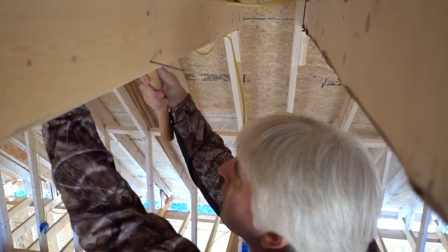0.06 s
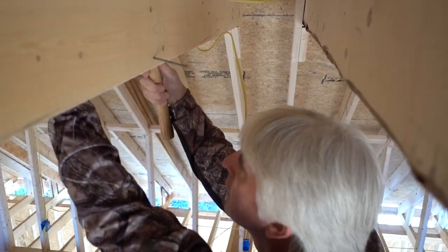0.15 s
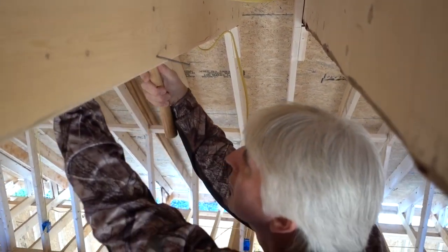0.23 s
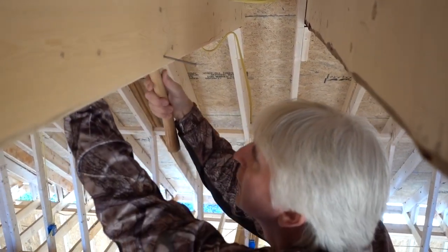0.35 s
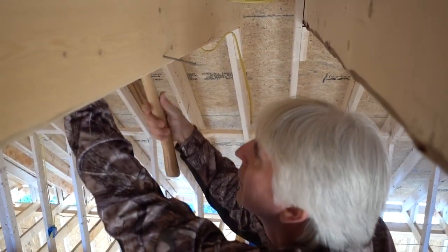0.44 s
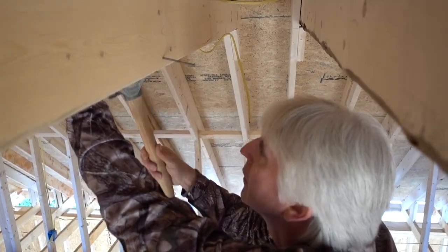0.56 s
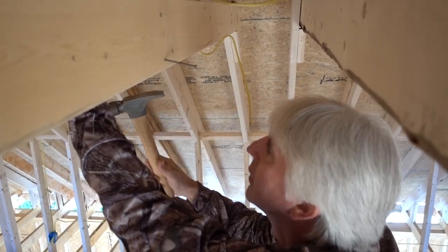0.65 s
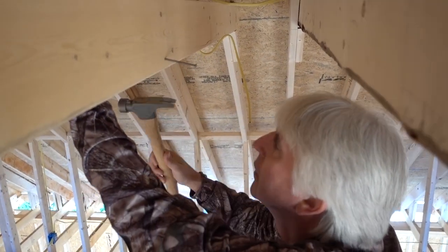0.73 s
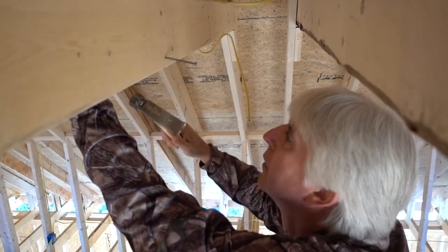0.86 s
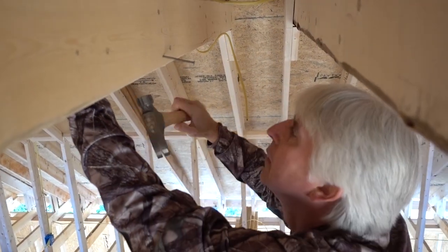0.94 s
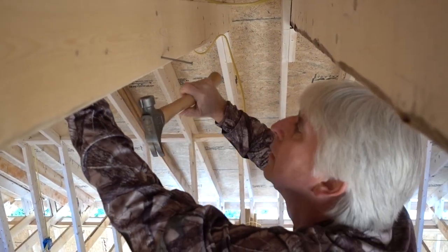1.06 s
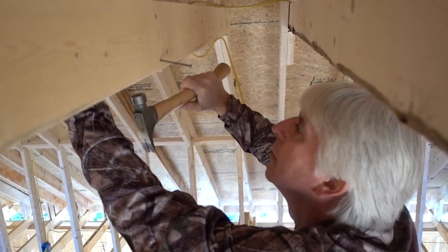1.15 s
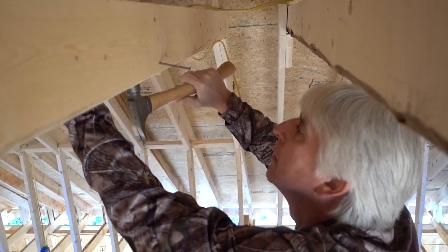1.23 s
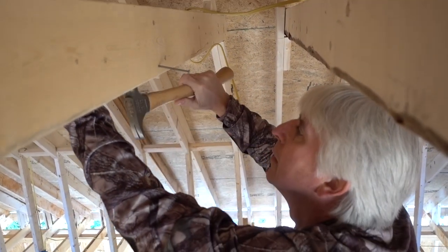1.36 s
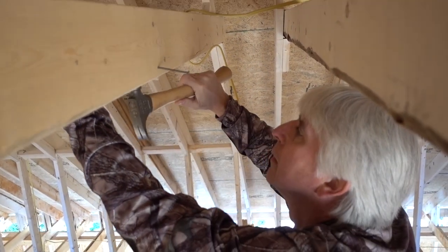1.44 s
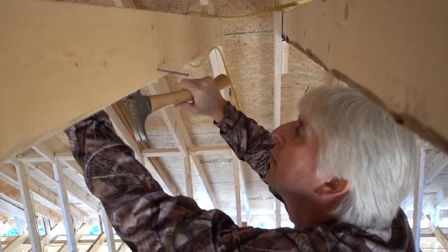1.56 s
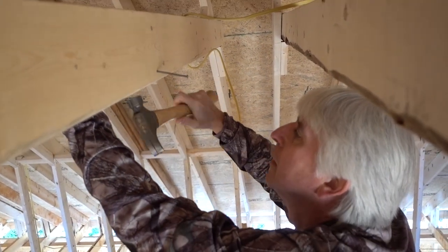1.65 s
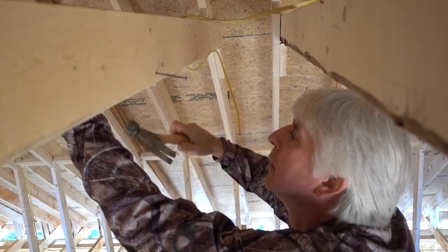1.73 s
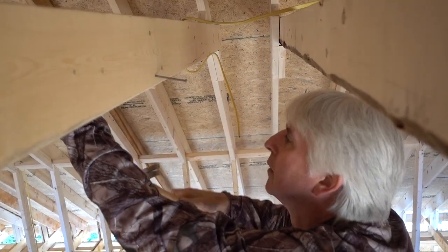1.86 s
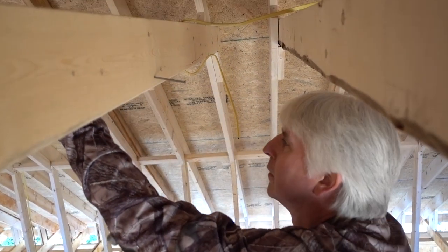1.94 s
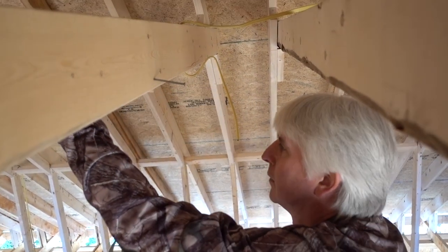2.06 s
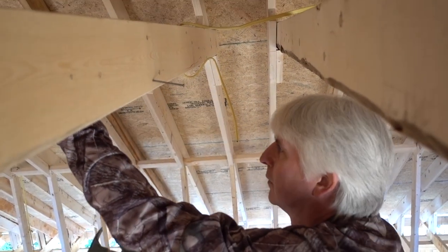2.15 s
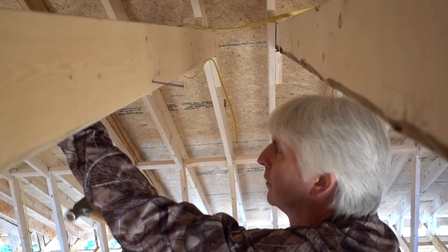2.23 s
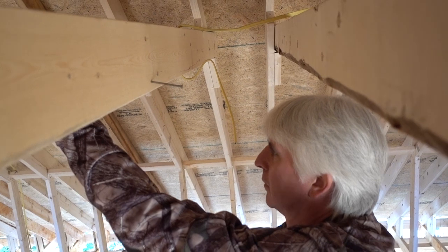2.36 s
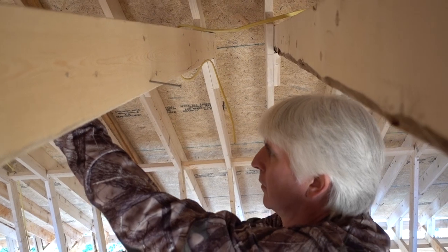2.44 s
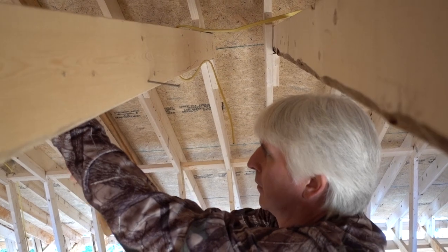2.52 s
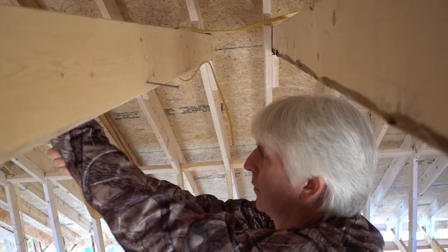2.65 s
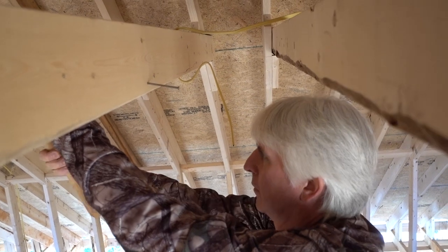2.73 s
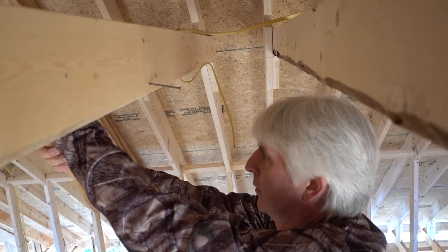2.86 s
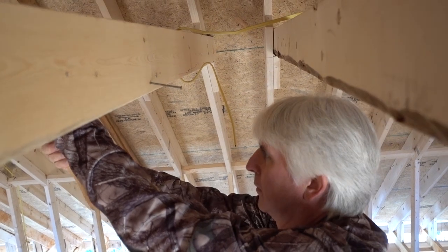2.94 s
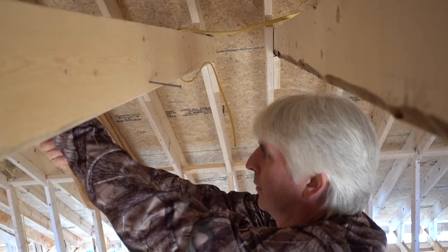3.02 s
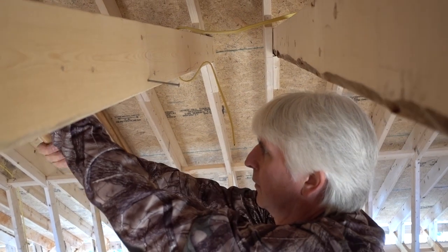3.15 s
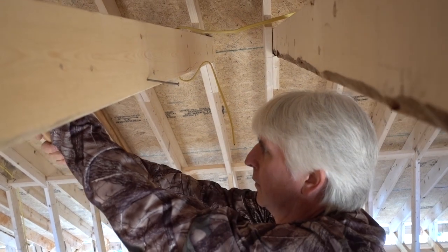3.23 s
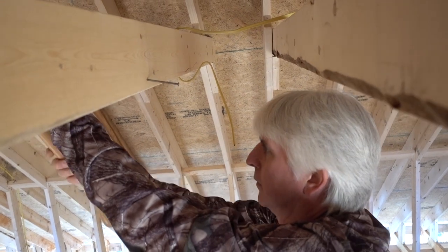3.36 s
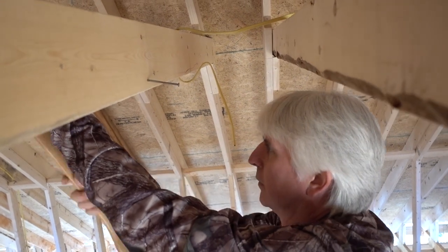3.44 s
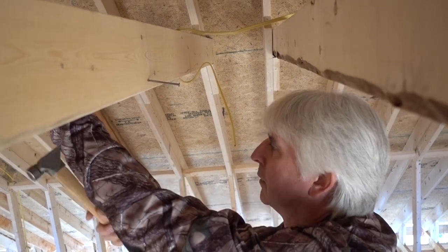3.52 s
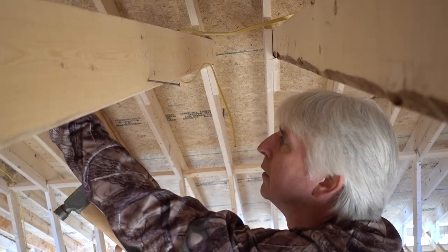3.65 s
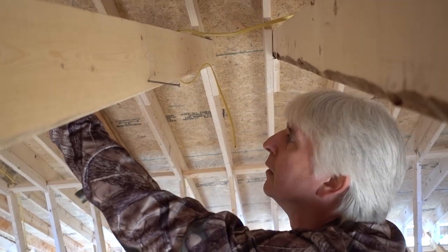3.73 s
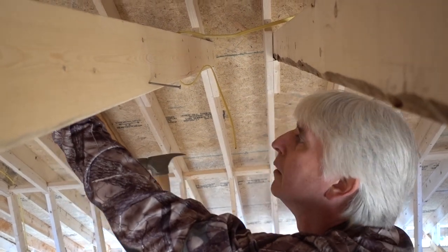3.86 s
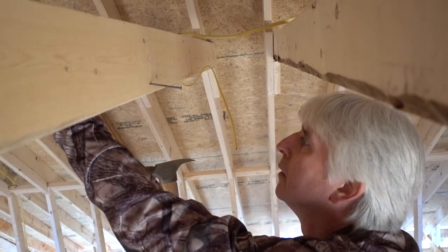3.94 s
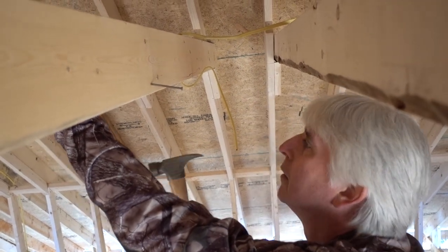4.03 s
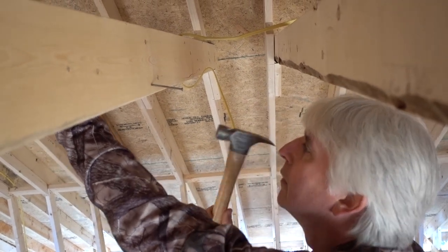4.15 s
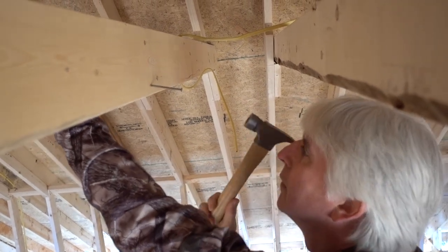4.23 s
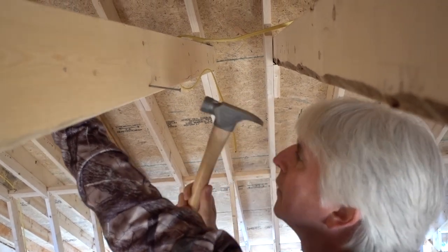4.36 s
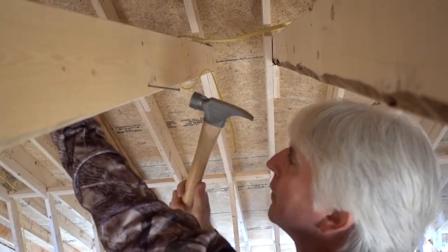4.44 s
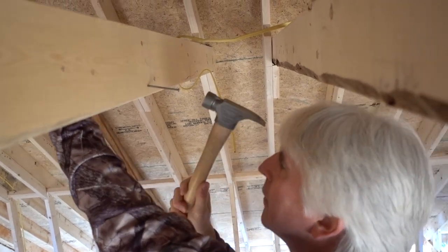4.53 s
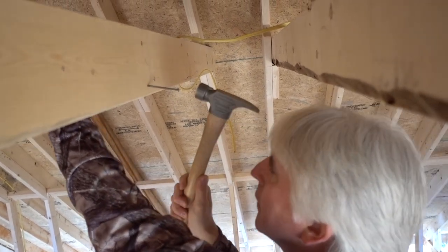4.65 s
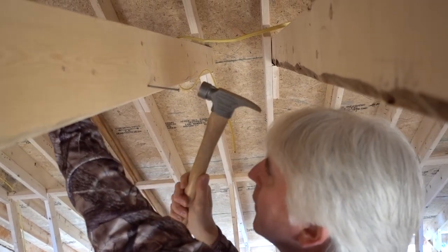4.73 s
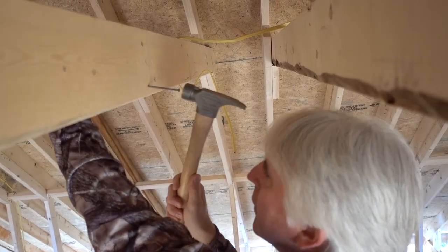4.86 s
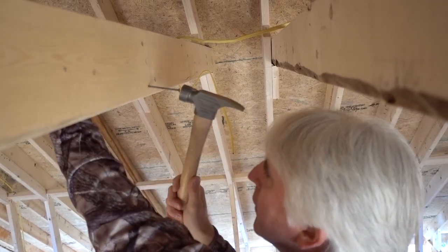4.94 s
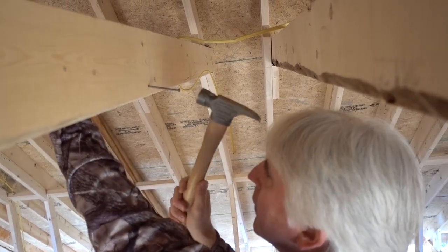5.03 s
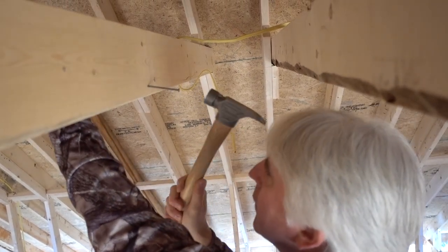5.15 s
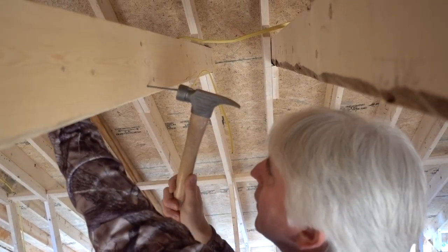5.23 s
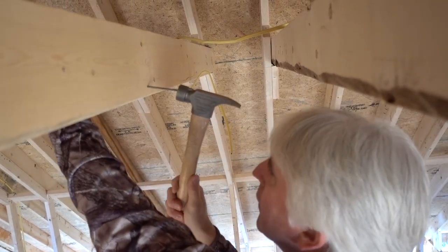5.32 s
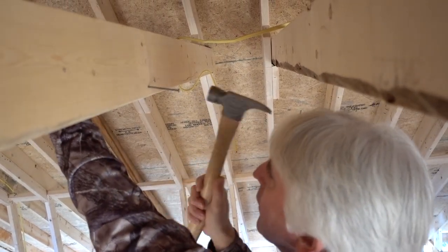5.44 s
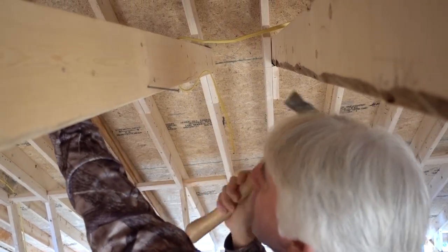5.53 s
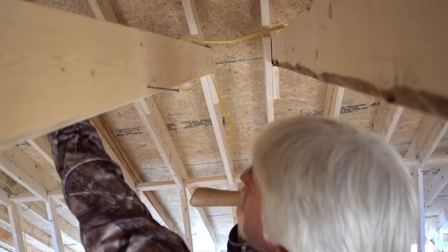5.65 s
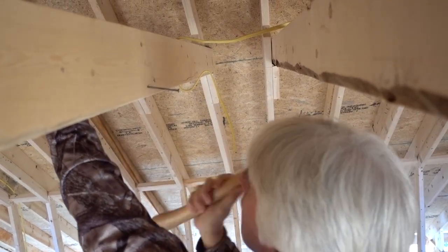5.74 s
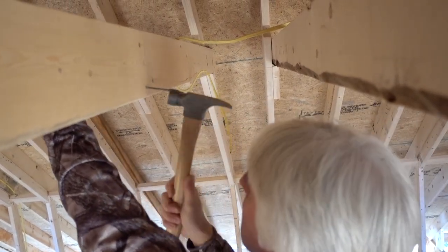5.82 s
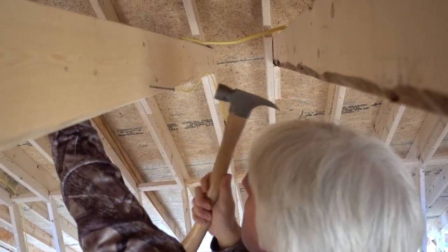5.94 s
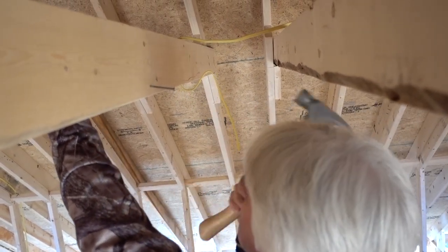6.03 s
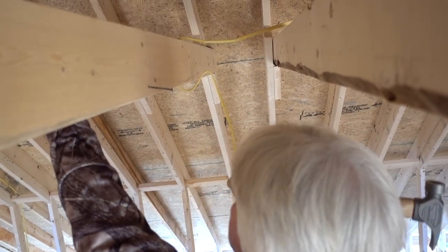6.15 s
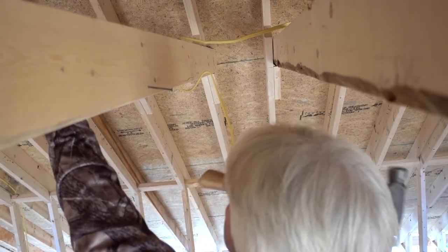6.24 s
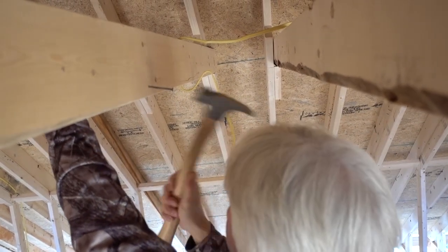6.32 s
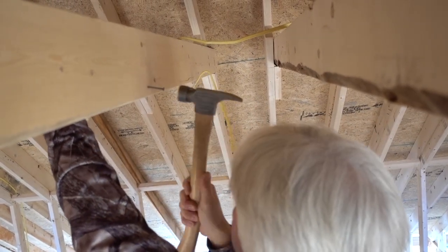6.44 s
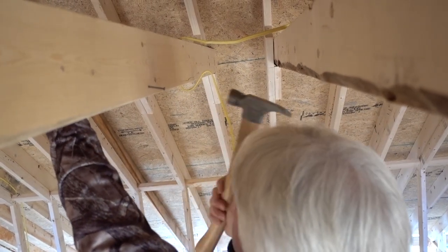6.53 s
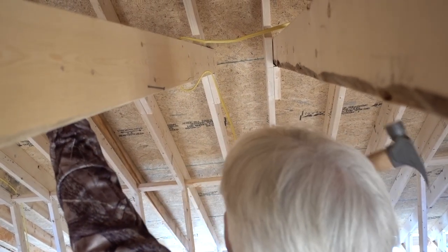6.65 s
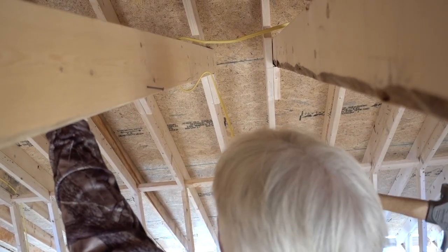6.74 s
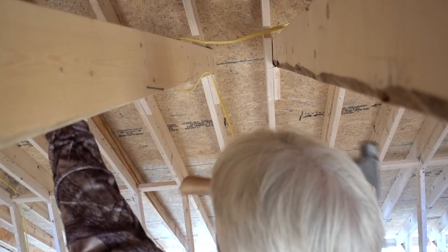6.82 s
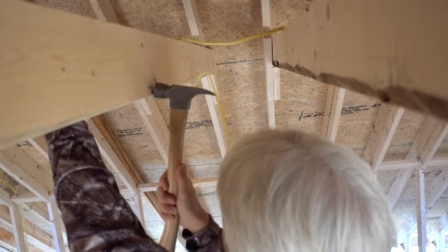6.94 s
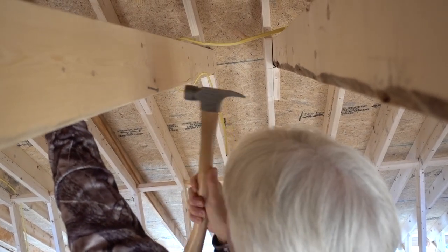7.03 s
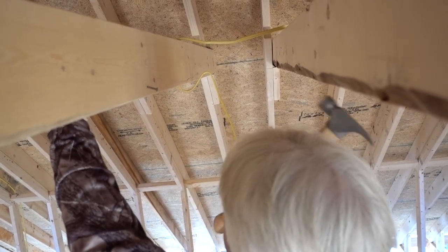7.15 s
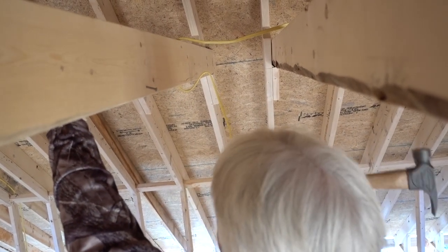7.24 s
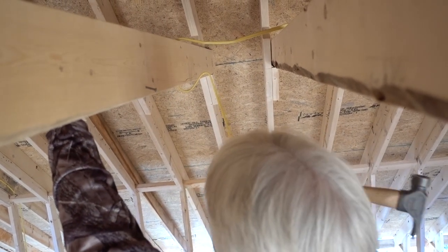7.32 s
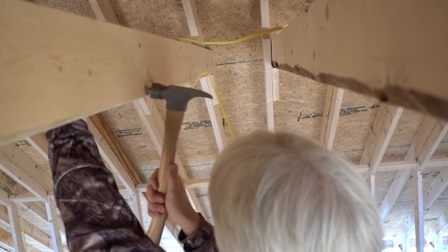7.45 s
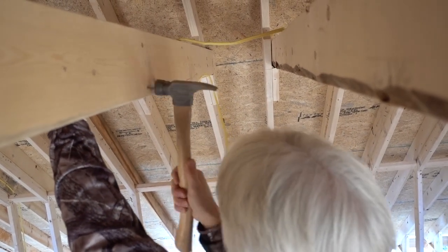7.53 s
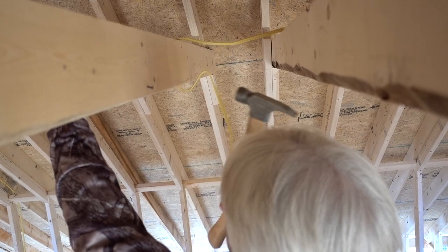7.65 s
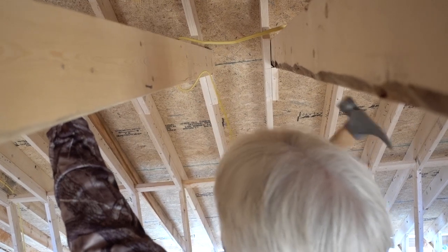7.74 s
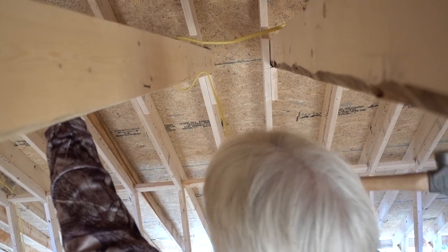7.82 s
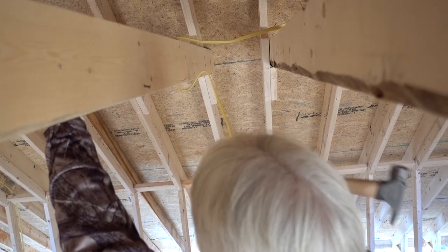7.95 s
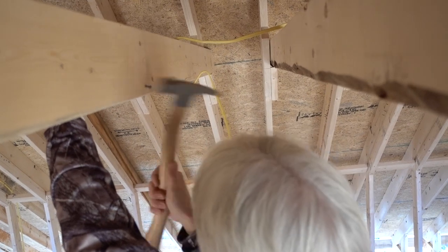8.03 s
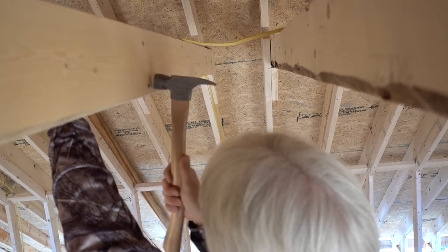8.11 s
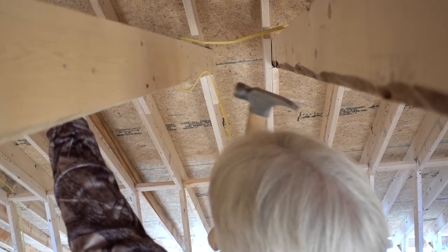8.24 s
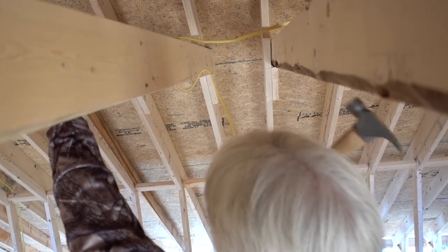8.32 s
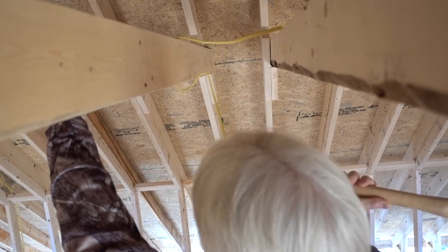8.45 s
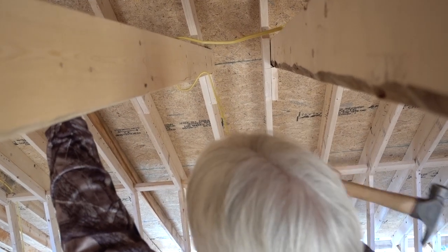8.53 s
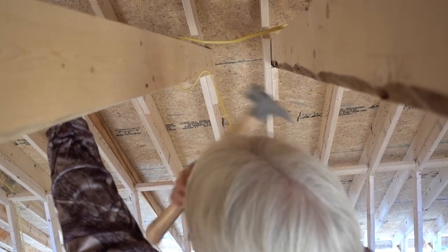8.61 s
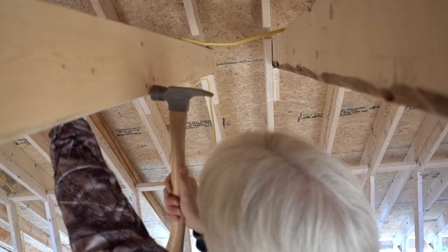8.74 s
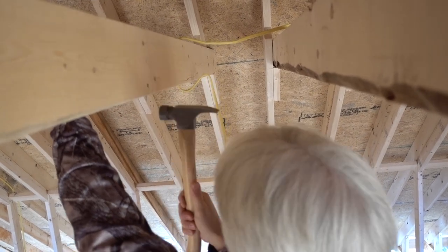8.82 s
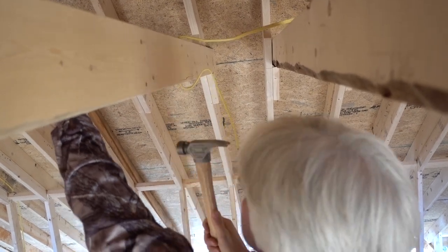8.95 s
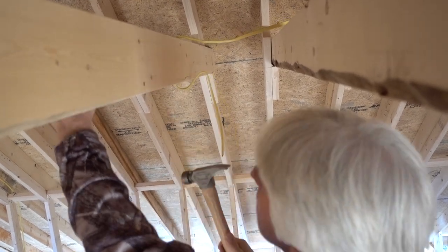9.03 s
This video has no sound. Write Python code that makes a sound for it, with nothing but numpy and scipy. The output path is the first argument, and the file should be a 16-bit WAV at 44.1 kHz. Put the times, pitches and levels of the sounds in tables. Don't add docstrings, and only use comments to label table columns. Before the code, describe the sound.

Uneven hollow hammer knocks on wood, then seven hard, ringing blows driving a nail into a beam, booming through an open timber building.

```python
import sys
import numpy as np
from scipy import signal
from scipy.io import wavfile

SR = 44100
rng = np.random.default_rng(int(sys.argv[2]) if len(sys.argv) > 2 else 0)


def int16_out(signal):
    q = np.round(np.clip(np.atleast_2d(signal).T, -1, 1) * 32767)
    wavfile.write(sys.argv[1], SR, q.astype(np.int16))


def boost(x):
    u = np.asarray(x, float) / 20
    return 10 ** u


N = 400428

# start_s, crack_db, boom_db, joist_bass_db, floor_bass_db
KNOCKS = [
    (0.084, -14, -9, -8.5, -15),
    (.352, -9, -17.5, 8, 13.5),
    (1.397, -12, -15, 1, 2),
    (1.5924, -16, -19.5, 1, 5),
    (2.9097, -6, -11, 9, -26),
    (3.192, -47, -33, 5, -23),
    (3.2705, -1.5, -6.5, 8.5, 5),
    (5.0116, -3, -8, 4, 4),
]
# start_s, crack_db, boom_db, joist_bass_db, floor_bass_db
BLOWS = [
    (5.337, 1.5, -0.5, -4.1, -13),
    (5.9198, 4.5, 1.5, -6, -1),
    (6.464, 7, 2.5, -4.5, 0),
    (7.025, 6.5, 3.5, -1.5, 2.5),
    (7.5736, 7, 3, 0, 1.5),
    (8.169, 3.5, 6, -5, -4.5),
    (8.7744, 2.5, 8.5, -8.5, -14.5),
]
AIR_LAG_MS = [5.9, 5.6, 5.2, 6, 5.6, 5.5, 5.9, 4.74, 6.9, 5.8, 4.2, 4, 4.9, 4.45, 6.5]
# (crack tilt, dB per octave)
SPOTS = [
    (740, 0, 0.13, 1.5),
    (740, -2.5, 0.058, -0.6),
    (1037, 0.5, 0.032, 1),
    (1030, -7, 0.034, 2.5),
    (590, -6, 0.026, -2),
    (424, -15, 0.058, 1),
    (736, -6.5, 0.27, -0.6),
    (453, -28, .07, 1),
]
# pitch_hz, t60_s
DYING = [(30, 0.79), (55, 1.31), (110, 0.74), (280, 0.7), (740, 0.71), (1900, 0.64), (3500, 0.47),
         (6000, 0.38), (10000, 0.27), (13000, 0.27), (16000, .16)]

HIT_S, CRACK_DB, BOOM_DB, JOIST_DB, FLOOR_DB = np.concatenate([KNOCKS, BLOWS]).T
ON_NAIL = np.arange(len(HIT_S)) >= len(KNOCKS)
AIR_LAG_S = np.array(AIR_LAG_MS) / 1000
BAND_EDGES = 22 * 2 ** np.arange(0, 9.7, 0.4)


def rms_one(x):
    return x / np.sqrt(np.mean(x ** 2) + 1e-20)


def at_hz(points, hz):
    curve_hz, values = np.array(points).T
    return np.interp(np.log(hz), np.log(curve_hz), values)


def clicks(times, sizes):
    out = np.full(N, 1e-18)
    np.add.at(out, np.round(np.asarray(times) * SR).astype(int), sizes)
    return out


def fade(kicks, t60, rise_s):
    fall = boost(-60 / (t60 * SR))
    rise = np.exp(-1 / (rise_s * SR))
    return signal.lfilter([1 - rise], np.convolve([1, -rise], [1, -fall]), kicks)


def ring(kicks, hz, t60):
    r = boost(-60 / (t60 * SR))
    w = 2 * np.pi * hz / SR
    return signal.lfilter([0, np.sin(w)], [1, -2 * r * np.cos(w), r * r], kicks)


def hum(white, hz, width_hz):
    r = np.exp(-np.pi * 1.5 * width_hz / SR)
    resonance = [0.99, 0.00044, -1, 1, -2 * r * np.cos(2 * np.pi * hz / SR), r * r]
    return rms_one(signal.sosfilt([resonance, resonance], white))


def struck(kicks, hz, width_hz, t60, shaken):
    pair = ring(kicks, hz - width_hz / 3, t60) + 0.2 * ring(kicks, hz + width_hz / 2.51, t60)
    waver = hum(rng.standard_normal(len(kicks)), hz, width_hz)
    return pair + shaken * waver * fade(np.abs(kicks), t60, 0.00043 + 1 / hz)


def drift(rate):
    r = np.exp(-80 * np.pi * rate / SR)
    white = rng.standard_normal(N // 40 + 2002)
    slow = signal.lfilter([1], [1, -2 * r, r * r], white)[2000:]
    return np.interp(np.arange(N) / 40, np.arange(len(slow)), rms_one(slow))


def bands(white, lowest_hz=0):
    white = np.concatenate([white[:, -SR // 4:], white], axis=1)
    for k, (low, high) in enumerate(zip(BAND_EDGES, BAND_EDGES[1:])):
        if low >= lowest_hz:
            slicer = signal.butter(3, [low, high], "band", fs=SR, output="sos")
            yield np.sqrt(low * high), signal.sosfilt(slicer, white[k % 2])[-N:]


def share(spectrum, hz):
    centres = np.sqrt(BAND_EDGES[1:] * BAND_EDGES[:-1])
    total = np.sum(boost(at_hz(spectrum, centres)) ** 2 * np.diff(BAND_EDGES)) / (SR / 2)
    return boost(at_hz(spectrum, hz)) / np.sqrt(total)


def cracks(slices):
    # pitch_hz, level_db per Hz
    knock_colour = [(300, -3), (1000, 6.5), (2000, -1.5), (3500, -4.5), (6000, -8), (9000, -15),
                    (11500, -12), (15500, -28)]
    # pitch_hz, level_db per Hz
    blow_colour = [(300, -49), (1000, 0), (2500, -1.5), (5000, 3.5), (7500, 9.5), (11000, 7.5), (15500, 3)]
    roof_lag_s, roof_db = 0.0053, -9.5
    timber_db = np.where(ON_NAIL, 2, -3.5)
    hard_db = np.r_[np.array(SPOTS)[:, -1], np.zeros(len(BLOWS))]
    by_air_s = HIT_S + AIR_LAG_S
    arrivals_s = np.r_[HIT_S, by_air_s, by_air_s + roof_lag_s]
    out = np.zeros(N)
    for hz, noise in slices:
        size = np.where(ON_NAIL, share(blow_colour, hz), share(knock_colour, hz))
        size = size * boost(CRACK_DB + hard_db * np.log2(hz / 2000))
        kicks = clicks(arrivals_s, np.r_[size * boost(timber_db), size, size * boost(roof_db)])
        snap = fade(kicks, 0.0083 + 33 / hz, 0.0001)
        nearest_reflections = 0.041 * fade(kicks, 0.16, 0.006)
        out += noise * (snap + nearest_reflections)
    return out


def bass_db(hz):
    joists = JOIST_DB * np.exp(-np.log2(hz / 150) ** 2 * 2)
    return joists + FLOOR_DB * np.exp(-np.log2(hz / 50) ** 2 * 2)


def boom(slices):
    # pitch_hz, level_db per Hz
    knock_colour = [(18, -36), (30, -12), (53, 1.5), (81, -13), (105, -8), (195, 4.5), (240, -0.5),
                    (328, 10.5), (497, 2), (612, 9), (1480, -17), (1870, -16.5), (3230, -45), (15000, -79)]
    # pitch_hz, level_db per Hz
    blow_colour = [(18, -49), (30, -5), (53, 12), (76, 2.5), (122, 9.5), (267, -5), (524, -2.5),
                   (1000, -10), (2560, -29), (5440, -35.5), (7830, -26), (8470, -37.5), (11000, -34),
                   (15000, -65)]
    tilt_db = np.where(ON_NAIL, 0.23, 1.43) + 0.2462 * CRACK_DB
    out = np.zeros(N)
    for hz, noise in slices:
        size = np.where(ON_NAIL, share(blow_colour, hz), share(knock_colour, hz))
        uneven_db = rng.standard_normal(len(HIT_S))
        level_db = BOOM_DB + bass_db(hz) + tilt_db * np.log2(hz / 500) + uneven_db
        kicks = clicks(HIT_S, size * boost(level_db))
        t60 = at_hz(DYING, hz)
        near = fade(kicks, t60, 0.0033 + 1 / hz)
        far = boost(-32) * fade(kicks, 2.2 * t60, 0.022)
        out += noise * (near + far)
    return out


def frame():
    # pitch_hz, width_hz, level_db
    joists = [(53.63, 19.4, -20.5), (88.4, 30, -14.5), (105.2, 31.7, -14), (132.2, 3, -16), (378, 6.2, -26),
              (474.5, 34.9, -21.5), (580, 170, -34), (786, 21, -19), (1310, 14, -65)]
    out = np.zeros(N)
    for hz, width_hz, level_db in joists:
        uneven_db = 1.7 * rng.standard_normal(len(HIT_S))
        kicks = clicks(HIT_S, boost(BOOM_DB + bass_db(hz) + level_db + uneven_db))
        out += struck(kicks, hz, width_hz, at_hz(DYING, hz), shaken=0.47)
    return out


def struck_spots():
    # pitch_hz, level_db, t60_s
    nail_notes = [
        (720, -10, 0.27),
        (1062, -12, 0.072),
    ]
    out, tick = np.zeros(N + 2 * SR), clicks([0], 0.79)[:SR]
    for s, lag_s, (hz, level_db, t60, _) in zip(HIT_S, AIR_LAG_S, SPOTS):
        out[round(s * SR):][:SR] += boost(level_db) * ring(tick, hz, t60 * 0.81)
        out[round((s + lag_s) * SR):][:SR] += boost(level_db + 4) * ring(tick, hz, t60)
    for hz, level_db, t60 in nail_notes:
        uneven_db = rng.normal(0, 1.3, len(BLOWS))
        out[:N] += ring(clicks(HIT_S[ON_NAIL], boost(level_db + uneven_db)), hz, t60)
    return out[:N]


def lingering_notes():
    # start_s, pitch_hz, width_hz, level_db
    boards = [(.084, 197, 27, -11.5), (.084, 742, 21, -19), (.084, 1187, 24, -21), (0.083, 53.6, 15.5, -14),
              (.352, 1210, 120, -16.5), (.352, 2120, 490, -25.5), (.352, 365.6, 26, -14),
              (1.397, 209, 38, -8.5), (1.397, 767, 24, -14.5), (1.397, 1037, 30.5, -12.5),
              (1.397, 539, 29, -15), (1.397, 942, 44, -16), (1.397, 1183, 42, -19), (1.397, 366, 27, -23),
              (.084, 560, 27, -32), (.084, 800, 27, -27), (3.2705, 985, 50, -17), (3.2705, 474, 30, -14),
              (1.397, 2530, 300, -39), (1.397, 1550, 220, -28.5), (1.5925, 1490, 350, -34),
              (1.5925, 182, 11, -16.5), (1.5925, 2480, 290, -38.5), (1.5925, 1082, 75, -18),
              (2.909, 133.5, 12, -15), (2.909, 272, 35, -27), (2.911, 1970, 320, -22.5),
              (2.907, 3840, 890, -28), (3.2705, 45, 3.3, -34), (3.2705, 330, 15, -25),
              (3.2705, 641, 88, -5), (3.2705, 1790, 320, -11), (3.2705, 2540, 1200, -23),
              (5.012, 398, 47, -4), (5.012, 1640, 290, -17), (5.012, 548, 160, -1.5),
              (5.013, 2160, 1240, -17.5), (5.011, 6850, 670, -27)]
    # start_s, pitch_hz, width_hz, level_db
    nailed = [(5.337, 397, 64, -4), (5.9195, 6030, 496, -11), (6.4645, 3180, 1000, -7),
              (6.4645, 6600, 1400, -4.5), (6.4645, 10800, 2200, -10), (7.025, 9900, 2500, -14),
              (7.025, 836, 22, -5.5), (7.025, 1045, 21.5, -3.5), (7.025, 4300, 400, -17),
              (7.025, 4720, 1100, -8), (7.572, 2020, 450, -7.5), (8.169, 10500, 1600, -6),
              (8.775, 1073, 63, 0), (8.775, 2130, 600, -8), (8.775, 10200, 1500, -16),
              (5.337, 2740, 910, -11.5), (7.572, 616, 61, -8.5)]
    out, tick = np.zeros(N + 2 * SR), clicks([0], 0.79)[:SR]
    for rows, t60_500, damping in (boards, 0.51, 0.28), (nailed, 0.55, 0.25):
        for near_s, hz, width_hz, level_db in rows:
            s = HIT_S[np.argmin(np.abs(HIT_S - near_s))]
            modes = width_hz / 60
            note = struck(tick, hz, width_hz, t60_500 * (500 / hz) ** damping, 0.5 + modes)
            out[round(s * SR):][:SR] += boost(level_db) * note / (1 + modes)
    return out[:N]


def hammer_head():
    # ping_db, rebounding_db, turn_s after the blow, flash_db, turned_away_db
    rebounds = [
        (-6, -55, .17, -66, -55),
        (-1, -34, 0.14, -35, -29.5),
        (7, -30, 0.15, -53, -33),
        (8, -32, 0.15, -35.5, -39),
        (15, -17, 0.14, -40, -23.5),
        (6.5, -31, 0.172, -33, -33),
        (-29, -31.5, .2, -38, -36),
    ]
    # start_s, pitch_hz, width_hz, level_db, t60_s
    claw_notes = [(5.337, 5550, 500, -15, .45), (5.92, 6350, 40, -24, .3), (6.4645, 3400, 650, -11, .45),
                  (6.4645, 6352, 40, -19, .25), (6.4645, 5911, 60, -25, .35), (6.4645, 7106, 60, -24, .3),
                  (7.025, 4700, 550, -10, .5), (7.025, 4926, 90, -21, .4), (7.025, 6368, 60, -27, .3),
                  (7.025, 4070, 80, -23, .4), (8.169, 6370, 60, -24, .4), (8.775, 6372, 24, -14, .3),
                  (8.775, 10660, 300, -14, .26)]
    head_hz, flash_s = 7565, 0.019
    doppler_hz, swing_s = 22, 0.33
    fade_db_per_s, stilled_s, stilling_db_per_s = 55, 0.39, 153
    level, shift_hz = np.zeros(N + SR), np.zeros(N + SR)
    t = np.arange(SR) / SR
    for blow, (_, facing_db, turn_s, flash_db, away_db) in zip(BLOWS, rebounds):
        start = round(blow[0] * SR)
        turned = np.clip((t - turn_s) / flash_s, 0, 1)
        db = facing_db + (away_db - facing_db) * turned
        db = db - fade_db_per_s * t - stilling_db_per_s * np.maximum(t - stilled_s, 0)
        flash = boost(flash_db) * np.exp(-((t - turn_s) / flash_s) ** 2)
        level[start:][:SR] += np.clip(t / 0.011 - 1, 0, 1) * (boost(db) + flash)
        shift_hz[start:][:SR] = doppler_hz * np.cos(np.pi * np.clip(t / swing_s, 0, 1))

    def tone(direction):
        return np.sin(2 * np.pi * np.cumsum(head_hz + direction * shift_hz[:N] + 5 * drift(8)) / SR)

    sine = tone(1) + 0.36 * tone(-1)
    out = np.sqrt(2) * sine * level[:N] * boost(3 * drift(26))
    out += ring(clicks(HIT_S[ON_NAIL], boost(np.array(rebounds)[:, 0])), head_hz, 0.018)
    for s, hz, width_hz, level_db, t60 in claw_notes:
        modes = width_hz / 60
        out += struck(clicks([s], boost(level_db)), hz, width_hz, t60, 0.5 + modes) / (1 + modes)
    return out


def steel_ticks():
    tick_db = [-12, -3.5, -24, -26, -35, -57, -22, -26]
    s = HIT_S[~ON_NAIL] + AIR_LAG_S[:len(KNOCKS)]
    bright = signal.butter(4, 9000, "high", fs=SR, output="sos")
    hiss = signal.sosfilt(bright, rng.standard_normal(N))
    return hiss * fade(clicks(s, boost(tick_db)), 0.0071, 0.0003)


def floor_deck():
    # start_s, level_db
    bounces = [
        (.09, -24),
        (2.92, -28),
        (3.55, -10.5),
        (5.02, -31),
        (5.93, -15),
        (6.48, -24),
        (7.04, -16),
        (8.18, -22),
    ]
    floor_hz, t60_s = 21.06, 2.7
    out, t = np.zeros(N), np.arange(N) / SR
    for s, level_db in bounces:
        start = round(s * SR)
        since = t[start:] - s
        swing = boost(level_db - 60 * since / t60_s) * np.sin(2 * np.pi * floor_hz * since)
        out[start:] = out[start:] * boost(-60 * since / 0.15) + swing * np.minimum(since / 0.05, 1)
    return out


def touches():
    # start_s, peak_db, note_hz, click_db and thud_db above the peak
    contacts = [(0.18, -33, 509, -19, 2), (2.293, -41, 2100, -9, -17), (2.611, -29, 780, -16, 0),
                (2.624, -30.5, 560, -10, 1.5), (2.701, -34.5, 520, -14, 6), (2.708, -29, 790, -4, 2.5),
                (2.766, -40, 667, -6, 11), (2.8125, -39, 800, -18, -1), (3.793, -17.5, 740, -28, -7),
                (3.8152, -29, 736, -27, -21), (4.029, -41, 708, 0, -4), (4.344, -34, 684, -9, -12),
                (4.857, -48, 756, 7, -14), (5.829, -24, 617, -18, -28), (5.858, -32, 720, -18, -28),
                (8.054, -29, 690, -33, -10), (8.663, -23, 510, -18, -17)]
    out, t = np.zeros(N), np.arange(SR // 5) / SR
    dull = signal.butter(2, 6000, fs=SR, output="sos")
    for s, peak_db, hz, click_db, thud_db in contacts:
        scratch = rng.standard_normal(len(t)) * boost(click_db - 60 * t / 0.0051)
        note = 0.36 * hum(rng.standard_normal(len(t)), hz, 220) + 0.5 * np.sin(2 * np.pi * hz * t)
        note = note * boost(-60 * t / 0.038)
        thud = hum(rng.standard_normal(len(t)), 64, 91)
        thud = thud * boost(thud_db - 60 * t / 0.076) * np.minimum(t / 0.0076, 1)
        out[round(s * SR):][:len(t)] += boost(peak_db + 2.5) * (note + thud + signal.sosfilt(dull, scratch))
    return out


def weight_shift():
    return hum(rng.standard_normal(N), 50, 21) * fade(clicks([5.5], boost(-12)), 1.2, 0.043)


def grip_squeaks():
    # start_s, length_s, pitch_hz, level_db
    squeaks = [
        (2.16, 0.021, 3120, -59),
        (2.217, 0.079, 2060, -49),
        (3.957, 0.05, 2410, -57),
        (3.955, 0.05, 4600, -56),
        (3.97, 0.066, 3000, -62),
    ]
    out, t = np.zeros(N), np.arange(SR // 5) / SR
    for s, length_s, hz, level_db in squeaks:
        swell = np.sin(np.pi * np.clip(t / length_s, 0, 1)) ** 2
        wander = np.cumsum(rng.normal(0, 0.054, len(t)))
        out[round(s * SR):][:len(t)] += boost(level_db) * swell * np.sin(2 * np.pi * hz * t + wander)
    return out


def sleeve_snaps():
    # start_s, peak_db
    fibres = [(2.604, -38), (2.6125, -36), (2.618, -34), (2.7085, -31), (2.768, -33), (2.8125, -27),
              (3.6185, -26), (3.6702, -32), (3.6792, -33), (3.6878, -30), (3.7574, -32), (3.765, -34),
              (3.7888, -24), (3.793, -23), (3.8003, -28), (3.8066, -22), (3.8092, -26), (3.8152, -17),
              (5.7904, -35), (5.8074, -35), (5.8293, -19), (5.8347, -23.5), (5.8438, -21), (5.8544, -25.5),
              (5.8582, -17.5), (5.869, -27), (6.355, -23), (6.3698, -20), (6.3846, -25), (6.3868, -25),
              (6.401, -21), (6.9578, -33), (6.9609, -31), (7.449, -35), (8.0546, -23), (8.0568, -26),
              (8.0585, -29), (8.6597, -26), (8.6652, -20)]
    top_hz = 5700
    s, peak_db = np.transpose(fibres)
    kicks = clicks(s, boost(peak_db))
    push = signal.sosfilt(signal.butter(3, [300, top_hz], "band", fs=SR, output="sos"), kicks)
    return push * SR / (2 * top_hz) + boost(-6.5) * ring(kicks, 805, 0.018)


def movement():
    # peak_s, peak_db, swell_s, settle_s
    rustles = [(0.078, -51, 0.14, 0.024), (0.258, -50.5, .02, 0.08), (0.65, -51.5, 0.45, .35),
               (0.836, -57, 0.037, .07), (1.075, -53, 0.14, .2), (1.242, -53.5, 0.54, 0.15),
               (2.092, -56.5, 0.88, 0.23), (2.17, -58, .03, .03), (2.5, -50.5, 0.76, 1),
               (2.612, -45.5, 0.063, 0.13), (2.718, -41.5, 0.066, 0.033), (3.22, -48.5, .06, .3),
               (3.61, -47, 0.24, 0.089), (3.688, -43, 0.16, 0.084), (3.814, -39.5, 0.16, 0.02),
               (3.9, -50.5, 0.24, .3), (3.972, -50.5, .2, 0.13), (4.476, -52, 0.3, 0.22),
               (4.736, -53, .08, 0.094), (5.79, -53, .2, 0.036), (5.83, -34.5, 0.017, 0.063),
               (6.384, -36, 0.082, 0.046), (6.954, -45, 0.23, 0.089), (7.452, -48.5, 0.14, 0.067),
               (8.056, -43.5, 0.037, 0.012), (8.1, -53.5, 0.22, .4), (8.66, -40.5, 0.034, 0.0088),
               (8.62, -51, .3, .06), (8.76, -51, 0.34, 0.024)]
    t = np.arange(0, N, 40) / SR
    db = np.full(len(t), -np.inf)
    for s, peak_db, swell_s, settle_s in rustles:
        away = np.maximum((s - t) / swell_s, (t - s) / settle_s)
        db = np.maximum(db, peak_db - 20 * away)
    return boost(np.interp(np.arange(N) / SR, t, db))


def sleeve():
    # pitch_hz, level_db per Hz
    cloth_colour = [(500, 2), (800, -4.5), (1500, -9.5), (3000, -14.5), (6000, -17), (9500, -19.5),
                    (12000, -17), (15500, -31)]
    grain_db = 2 * drift(60) + 3.5 * np.minimum(rng.exponential(1, N), 5)
    grains = rms_one(rng.standard_normal((2, N)) * boost(grain_db))
    cloth = sum(share(cloth_colour, hz) * noise for hz, noise in bands(grains, lowest_hz=600))
    return boost(5.5) * movement() * cloth


def open_site(slices):
    # pitch_hz, level_db per Hz
    site_colour = [(13, -30), (22, 1.5), (33, -4), (44, -17), (64, -26.5), (112, -15), (155, -24),
                   (536, -31.5), (880, -34.5), (956, -33), (2010, -45.5), (5570, -48), (15800, -52)]
    swell_db = 0.2 * drift(0.17)
    air = sum(share(site_colour, hz) * boost(swell_db + drift(20)) * noise for hz, noise in slices)
    return boost(-41.5) * air + boost(-56) * hum(rng.standard_normal(N), 95, 20)


def scene():
    slices = list(bands(rng.standard_normal((2, N))))
    hits = cracks(slices) + boom(slices) + frame() + struck_spots() + lingering_notes()
    steel = hammer_head() + steel_ticks()
    handling = touches() + weight_shift() + grip_squeaks() + sleeve_snaps() + sleeve()
    return (hits + steel + floor_deck() + handling + open_site(slices))[None]


def band_limit(x):
    return signal.sosfilt(signal.butter(12, 16000, fs=SR, output="sos"), x)


def record(dry):
    limit, release_db_per_s, attack_s = 0.96, 259, 0.012
    early_ceiling, wake_s, awake_s = 0.55, 0.0045, 0.06
    dry = signal.sosfilt(signal.butter(3, 37, "high", fs=SR, output="sos"), dry)
    t, lag = np.arange(N) / SR, round(wake_s * SR)
    over_db = np.maximum(20 * np.log10(np.abs(dry) / limit + 1e-9), 0)
    released_db = release_db_per_s * t
    held_db = np.maximum.accumulate(over_db + released_db, axis=-1) - released_db
    a = np.exp(-1 / (attack_s * SR))
    limited = dry * boost(-signal.lfilter([1 - a], [1, -a], held_db))
    last_loud = np.maximum.accumulate(np.where(np.abs(dry) > early_ceiling, t, -1), axis=-1)
    noticed = np.pad(last_loud, ((0, 0), (lag, 0)), constant_values=-1)[:, :N]
    ceiling = np.where(t - noticed < awake_s, 1, early_ceiling)
    top_cut = signal.cheby2(10, 50, 16200, fs=SR, output="sos")
    return band_limit(signal.sosfilt(top_cut, np.clip(limited, -ceiling, ceiling)))


dry = scene()
out = record(dry)
int16_out(out)
```